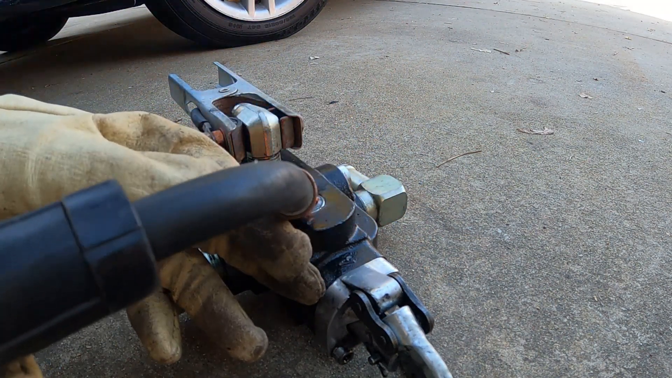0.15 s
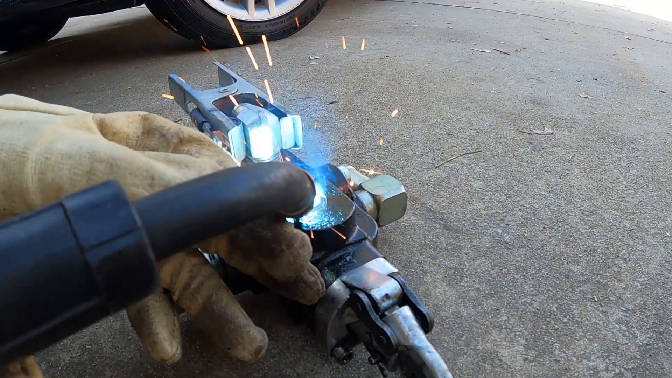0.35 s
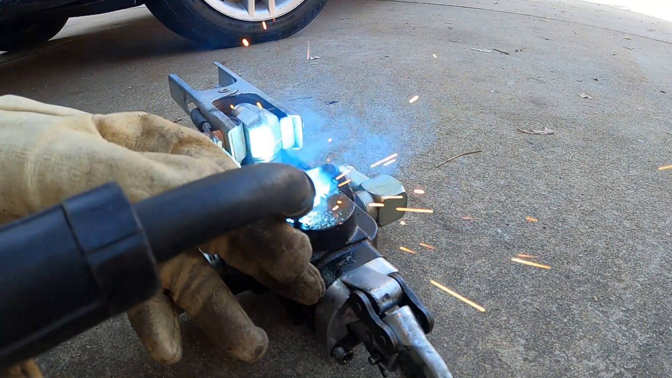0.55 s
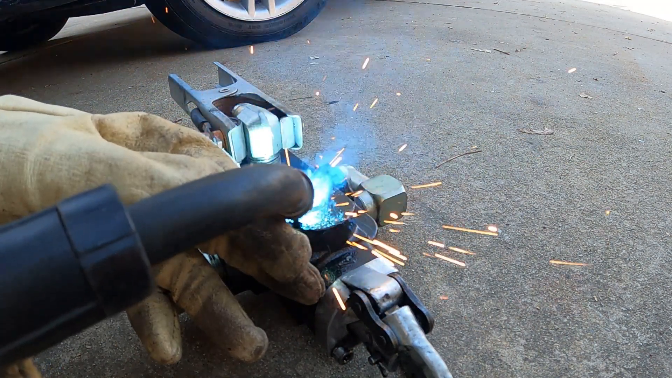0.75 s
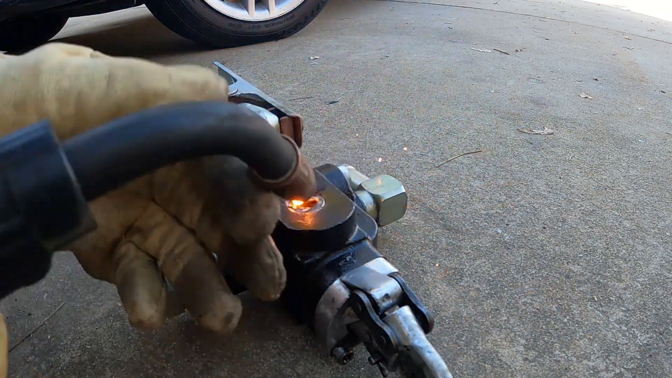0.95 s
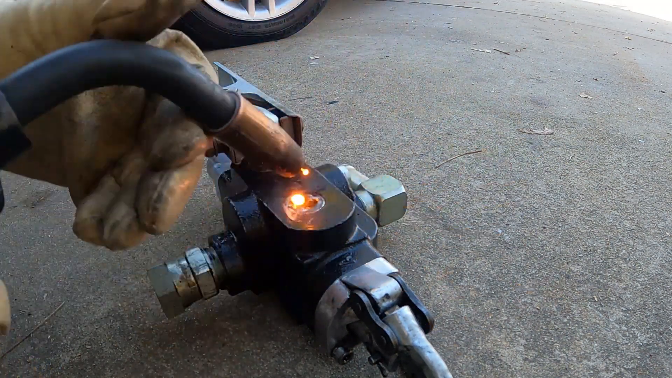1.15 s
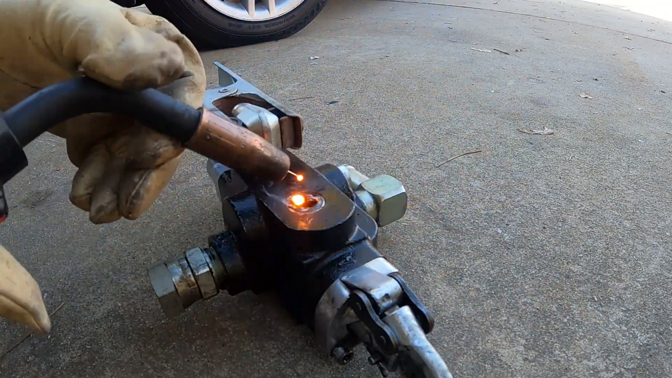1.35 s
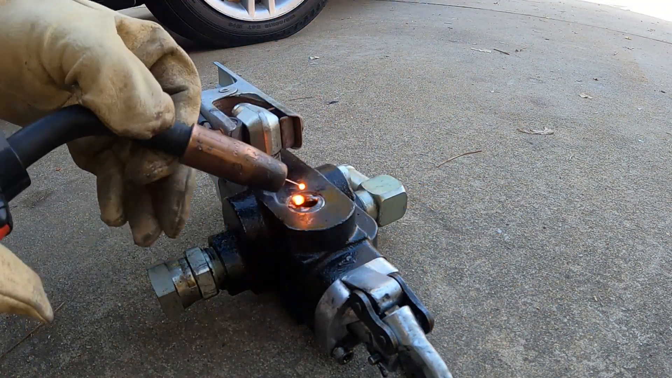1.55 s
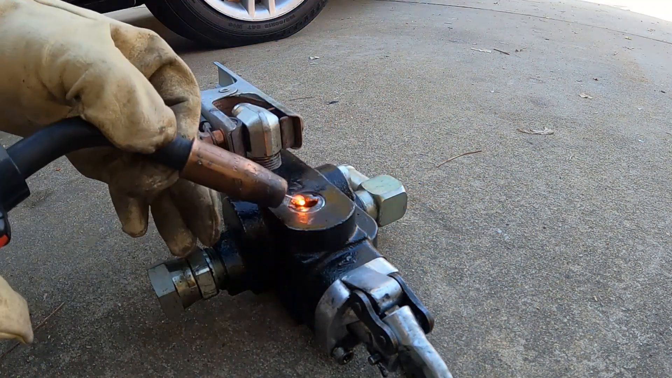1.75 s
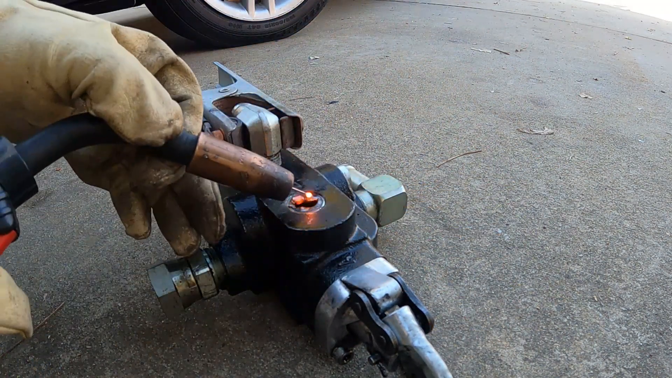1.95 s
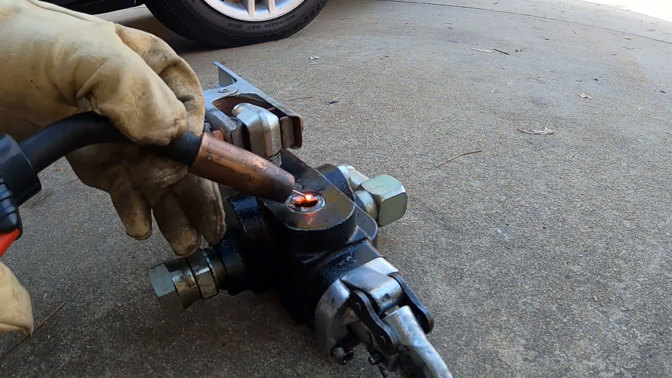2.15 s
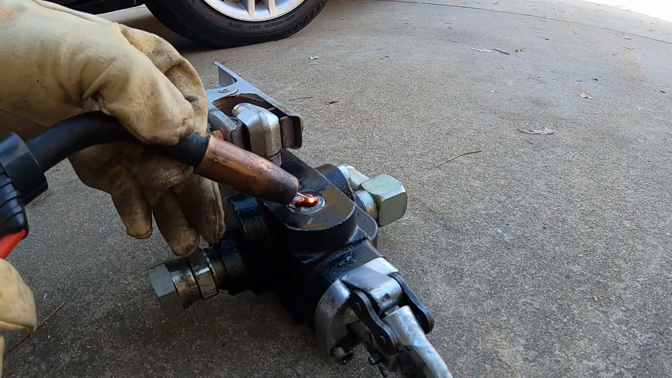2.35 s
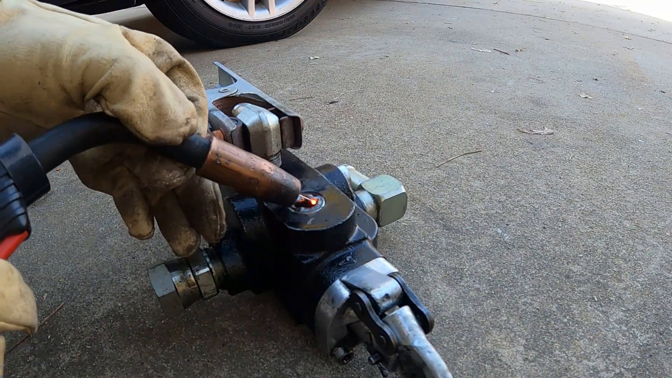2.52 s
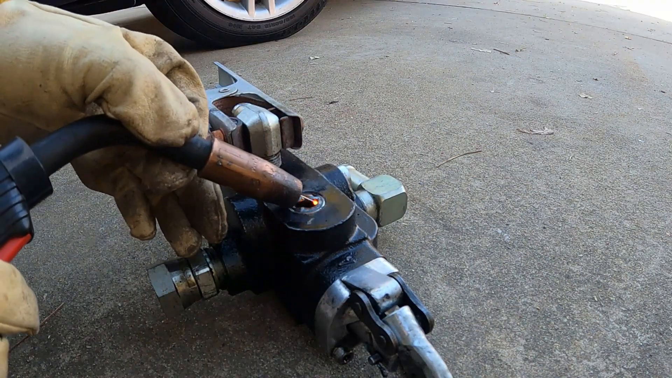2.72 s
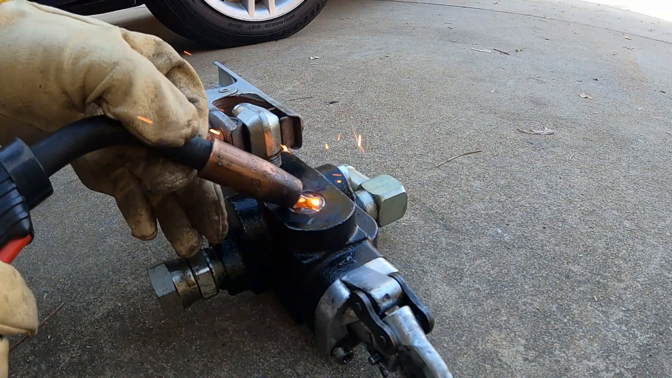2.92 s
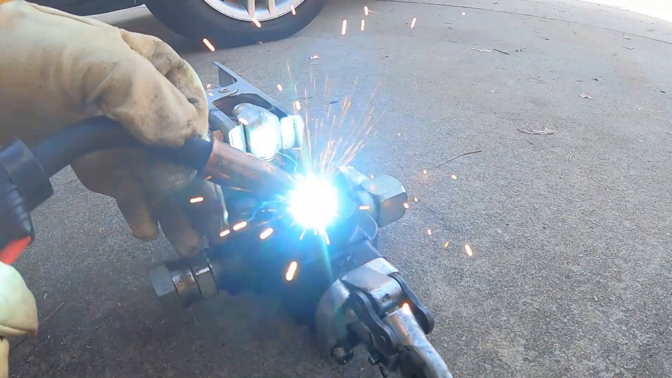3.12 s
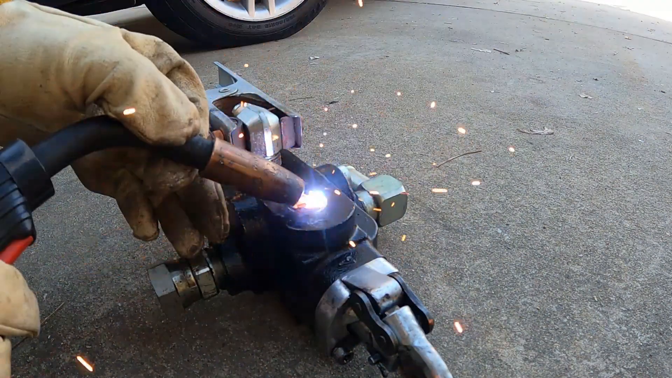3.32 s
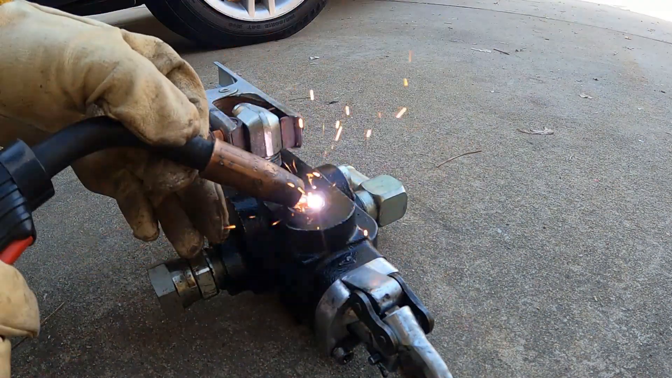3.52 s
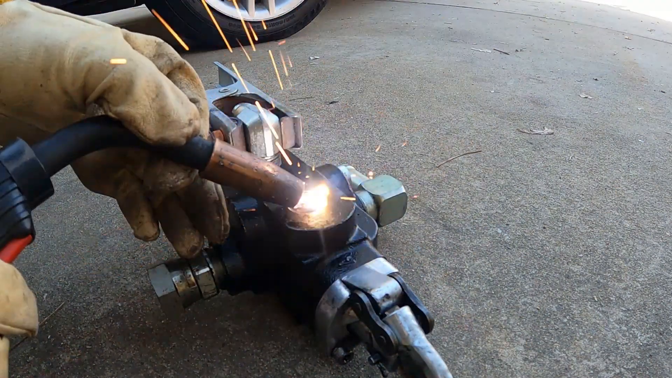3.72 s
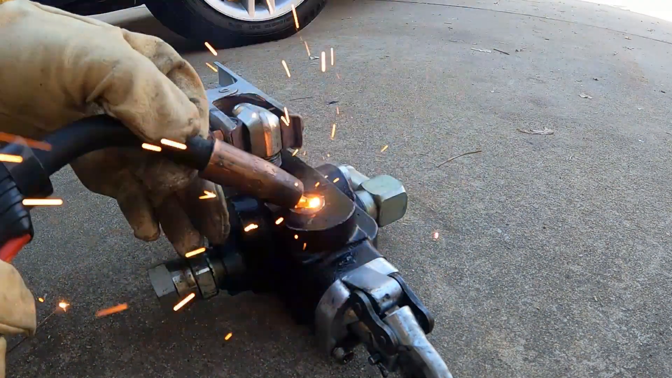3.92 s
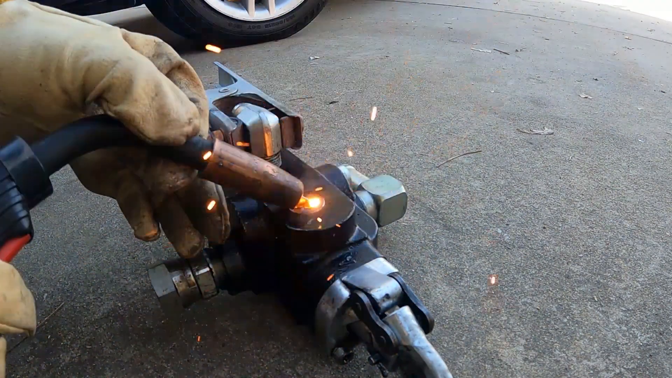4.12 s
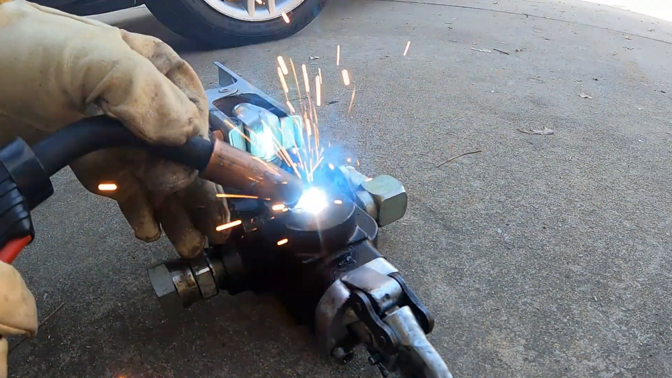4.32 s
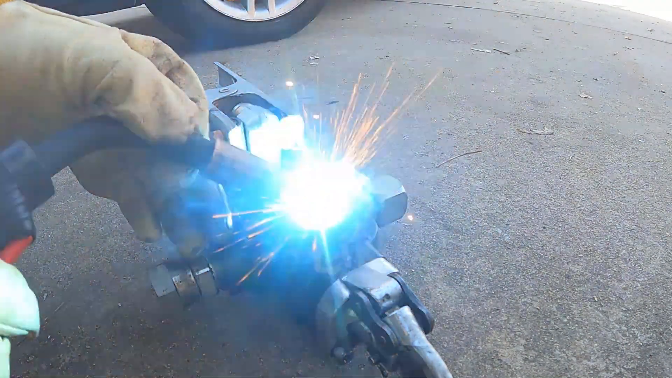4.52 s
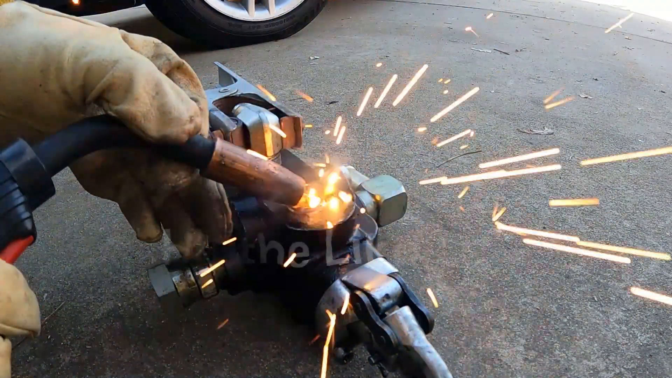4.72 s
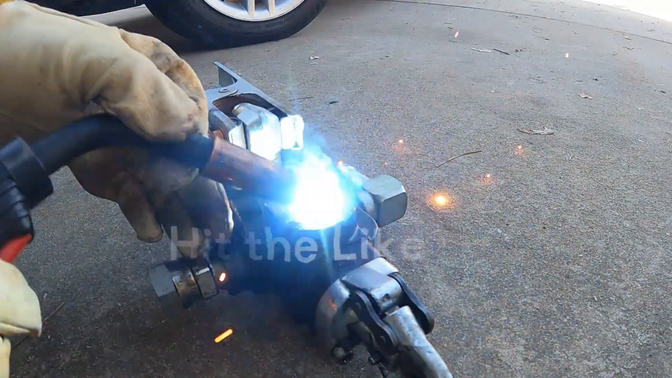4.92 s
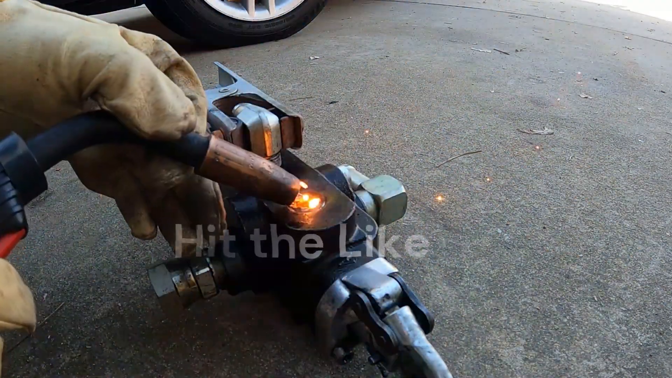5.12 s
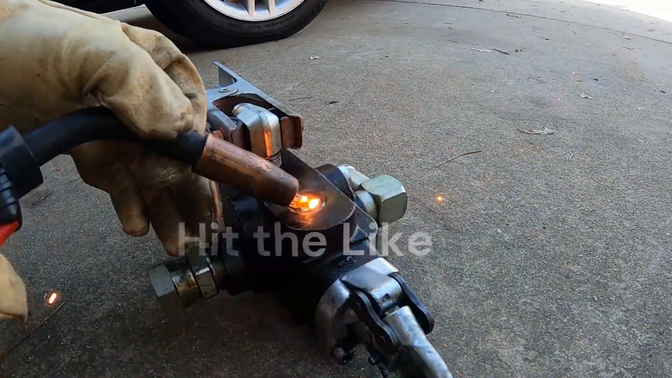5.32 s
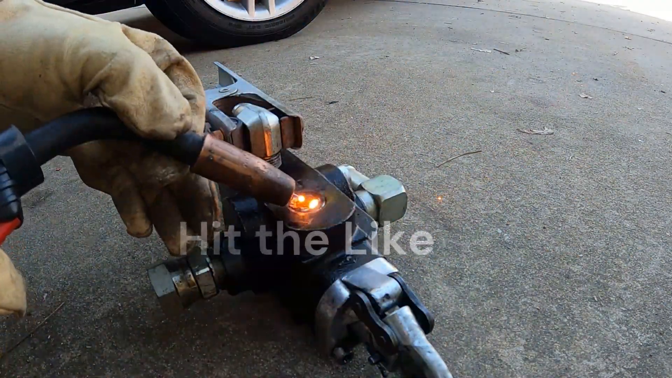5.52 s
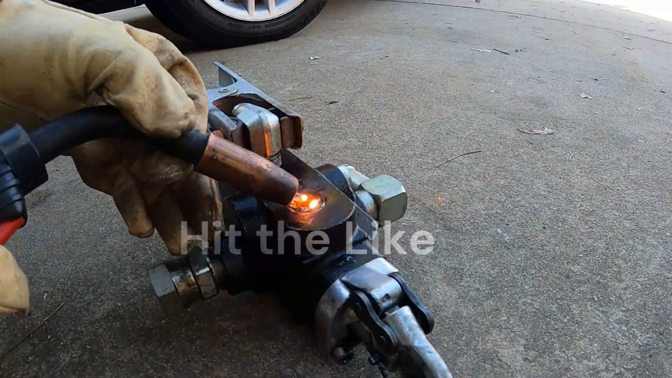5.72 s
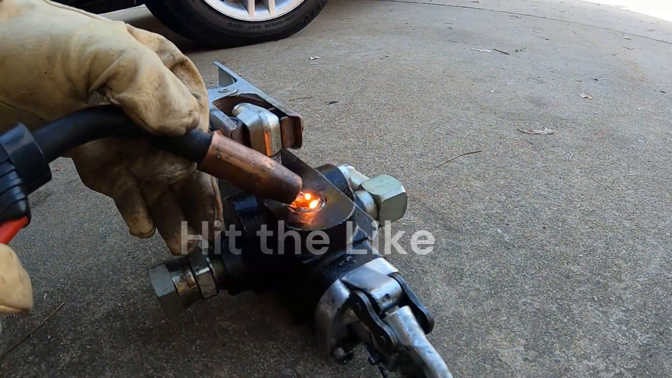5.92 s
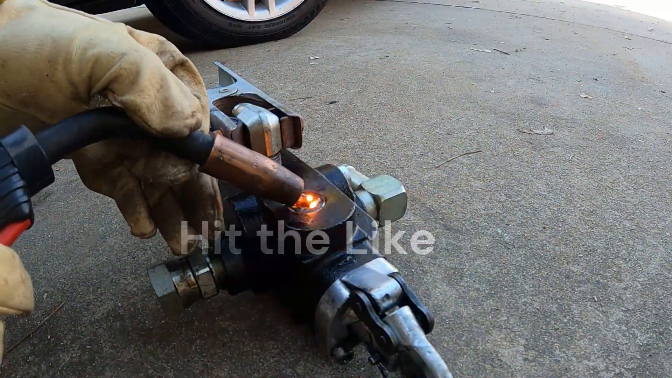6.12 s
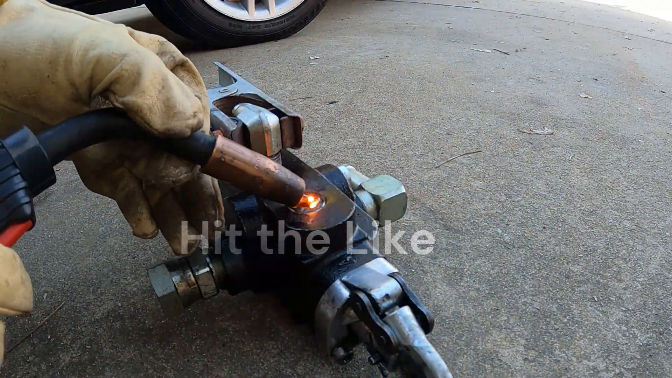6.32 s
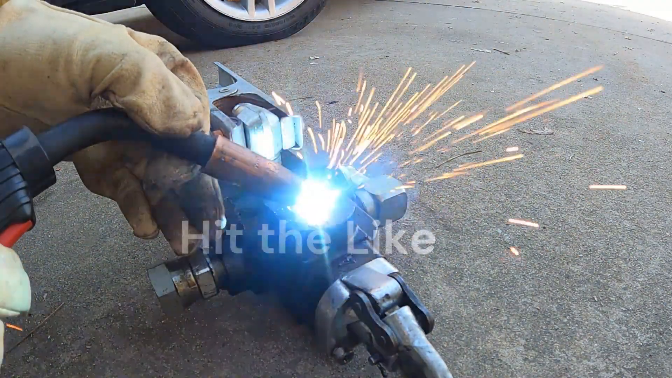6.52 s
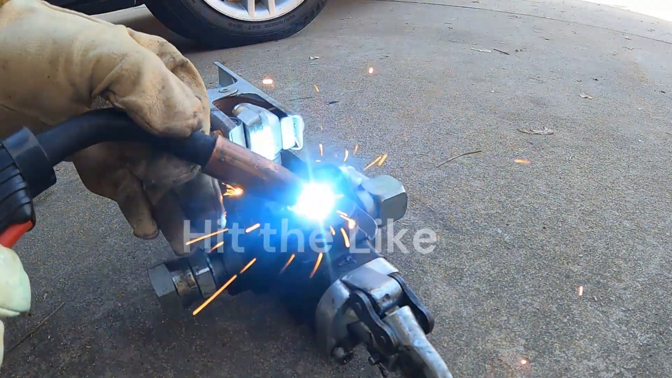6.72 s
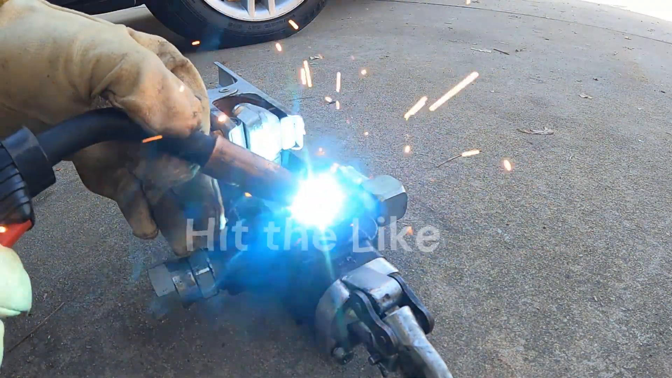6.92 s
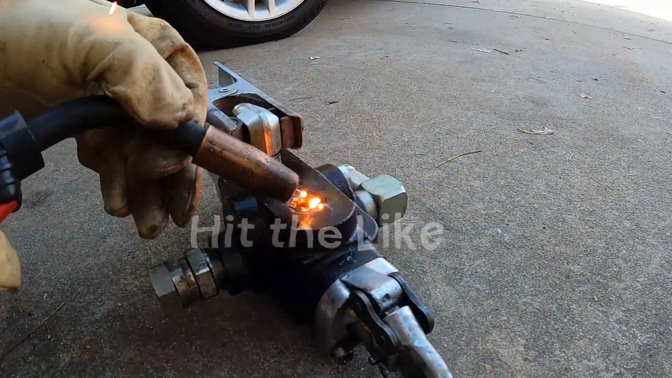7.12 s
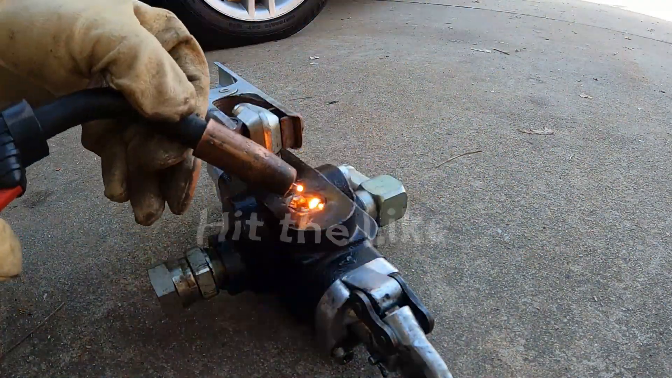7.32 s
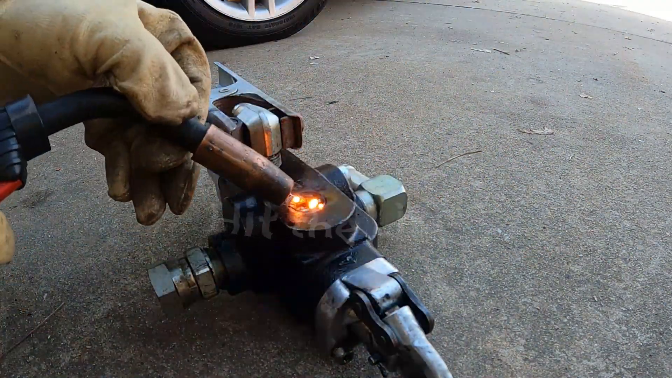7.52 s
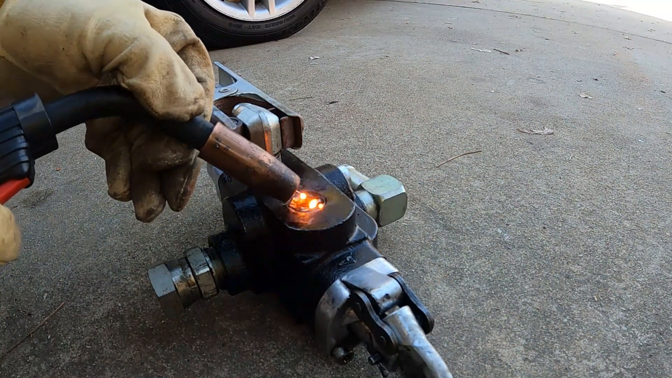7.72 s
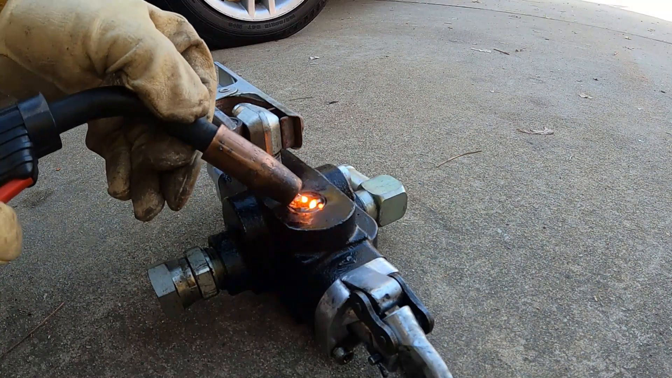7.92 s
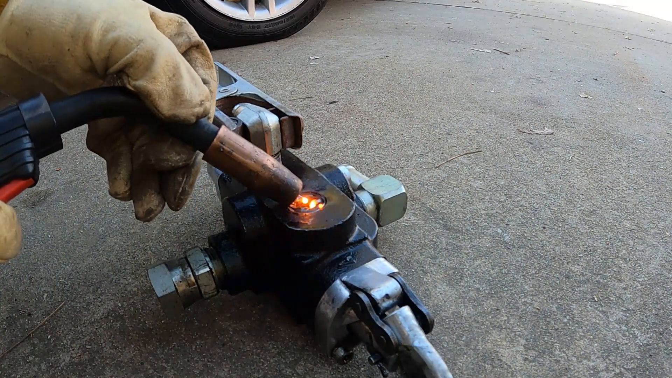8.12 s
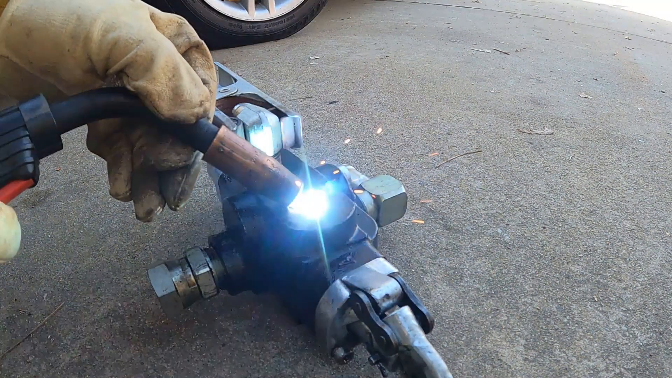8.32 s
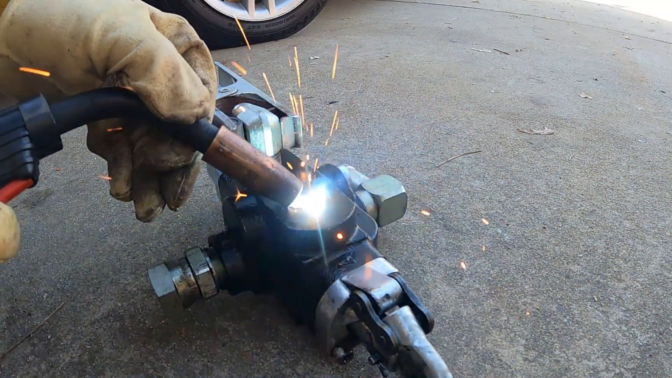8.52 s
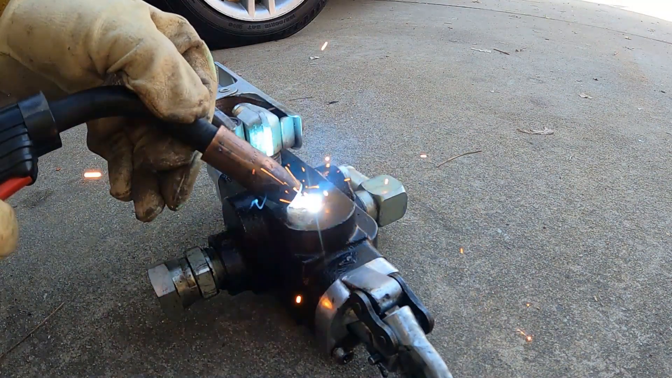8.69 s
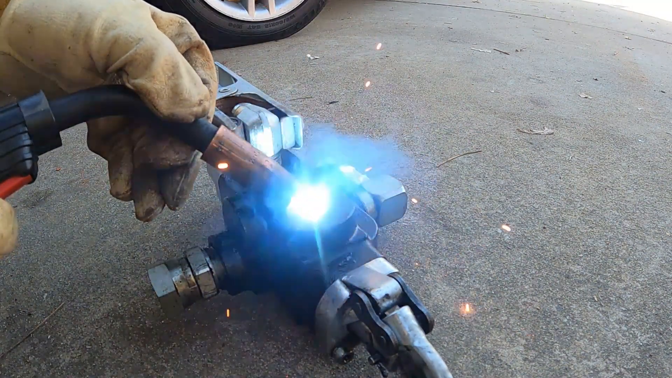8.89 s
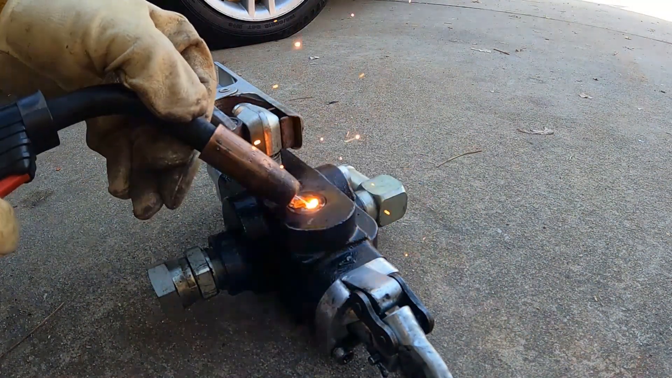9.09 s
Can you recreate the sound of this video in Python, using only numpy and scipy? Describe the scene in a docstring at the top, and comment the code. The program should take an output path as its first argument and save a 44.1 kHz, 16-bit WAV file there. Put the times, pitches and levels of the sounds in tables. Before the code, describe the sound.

Four bursts of sharp, sizzling crackle come from a wire-feed welding torch working on steel, heard close up on a concrete drive. Each opens with a trigger rattle and a puff of gas that buffets the microphone. The second burst is the longest; the others last about half a second. In between, gas and hot metal hiss softly while the machine hums and its fan whines, with light wind.

```python
"""On a concrete drive, microphone close up: a wire-feed welder tacks a steel fitting in four bursts.
First, transformer hum, fan whine and a little wind. The trigger rattles, shielding gas surges, and
the arc starts: each short circuit of the wire sizzles up, cracks and puffs hot gas at the microphone,
while the hum sinks. The trigger lets go; gas and hot bead hiss and the hum creeps back.
The longest burst follows at 3 s, then short ones at 6.6 s and 8.4 s."""
import sys
import numpy as np
from scipy import signal
from scipy.io import wavfile
from scipy.ndimage import uniform_filter1d

SR = 44100
rng = np.random.default_rng(int(sys.argv[2]) if len(sys.argv) > 2 else 0)


def bounce(signal):
    """Save signal as a 16-bit WAV file at the path given by the first command-line argument."""
    frames = np.transpose(np.atleast_2d(signal))
    limited = np.clip(frames, -1, 1)
    pcm = np.round(limited * 32767).astype(np.int16)
    wavfile.write(sys.argv[1], SR, pcm)


N = 403515
T = np.arange(N) / SR
ARC_RISE_S = .02
# arc burning: start/s, end/s, hum under the arc/dB, hum settled/dB, recovery/s, rumble/dB, arc hiss/dB
WELDS = [(.36, 0.98, -35.5, -32.5, 0.85, -31.5, -50), (3.04, 5.013, -38.5, -35.5, 0.56, -33, -48.5),
         (6.6, 7.061, -41, -33.5, 1.27, -33.5, -47), (8.444, 8.964, -37, -37, .5, -44, -44.5)]


def arc():
    """The wire shorts to the steel again and again; torch and glove colour each burst by their pose."""
    # t/s, crack/dB, signed puff pressure/linear, sizzle/dB
    short_circuits = [(0.3714, -2, 0.42, -22.5), (0.4054, -20, 0.079, -24), (0.4185, -5, 0.14, -25),
                      (0.4334, -13, -0.033, -27), (0.447, -9, -0.14, -37), (0.4622, -11.5, 0.063, -27),
                      (0.481, -10.5, 0.086, -25), (0.5, -15, 0.016, -35), (0.6, -8, -0.022, -23.5),
                      (0.6141, -9.5, -0.099, -34), (0.6221, -14, -0.14, -37), (0.6325, -14, -0.046, -39),
                      (0.6391, -13, -0.12, -34), (0.646, -24, 0.043, -39), (0.6555, -13, -0.1, -39),
                      (0.663, -15, -0.19, -35), (0.6773, -9.5, -0.076, -36), (0.6928, -13.5, 0.018, -32),
                      (0.7074, -14, 0.039, -35), (0.7185, -19, 0.17, -37), (0.7277, -11.5, 0.077, -36),
                      (0.739, -16, -0.12, -39), (0.7474, -15, -0.14, -39), (0.7551, -11.5, -0.12, -35),
                      (0.7629, -14, -0.064, -45), (0.7714, -11.5, -0.1, -38), (0.78, -12.5, -0.1, -38),
                      (0.7915, -15, -0.03, -41), (0.803, -16, -0.037, -36), (0.8115, -12, -0.16, -36),
                      (0.8213, -14, -0.13, -41), (0.829, -12, -0.15, -34), (0.838, -12, -0.088, -35),
                      (0.8524, -14, 0.081, -33.5), (0.861, -9.5, 0.048, -43), (0.8711, -16, 0.021, -38),
                      (0.8796, -11, -0.02, -40), (0.889, -14, -0.049, -37), (0.9, -9, -0.11, -35),
                      (0.9097, -17, -0.048, -35), (0.921, -10.5, -0.028, -34), (0.9352, -14, 0.023, -37),
                      (0.9458, -10, 0.061, -36), (0.9597, -15, 0.063, -40), (0.9733, -12.5, 0.038, -29.5),
                      (3.0459, -0.5, 0.29, -19.5), (3.0811, -4.5, 0.13, -22), (3.1046, -9, 0.44, -23.5),
                      (3.1342, -9, -0.1, -28.5), (3.1914, -7.5, -0.0072, -24), (3.2309, -19, -0.42, -23),
                      (3.274, -10.5, 0.11, -22), (3.3206, -6, -0.12, -24), (3.3506, -13, 0.096, -33),
                      (3.3899, -10, -0.26, -27), (3.4102, -14, 0.076, -36), (3.425, -15, 0.019, -27.5),
                      (3.463, -12, -0.088, -25.5), (3.502, -15.5, -0.11, -29.5),
                      (3.573, -9.5, -0.15, -22.5), (3.613, -12, -0.12, -29.5), (3.625, -22, 0.039, -39),
                      (3.633, -15.5, 0.1, -36), (3.655, -13.5, -0.12, -28.5), (3.7001, -12, -0.0055, -30),
                      (3.716, -15, -0.11, -33), (3.7219, -12.5, -0.13, -31), (3.7335, -11, -0.18, -29.5),
                      (3.7395, -10.5, -0.15, -37.5), (3.751, -17.5, -0.071, -32), (3.7571, -17, -0.12, -38),
                      (3.7747, -17.5, -0.01, -40), (3.792, -15, -0.04, -28.5), (3.8496, -8.5, 0.24, -23.5),
                      (3.8856, -11, 0.029, -38), (3.8997, -27, 0.037, -42), (3.9052, -12.5, -0.23, -29),
                      (3.9123, -23, -0.06, -29.5), (3.9258, -14, 0.057, -37), (3.933, -13, 0.044, -38),
                      (3.9433, -15, 0.01, -34), (3.9593, -12, -0.076, -26.5), (3.9819, -15, -0.14, -29),
                      (4.0096, -14.5, -0.06, -32), (4.0194, -18.5, -0.0069, -26.5),
                      (4.034, -14.5, -0.04, -42), (4.0414, -17, -0.15, -25.5), (4.0493, -10, -0.2, -56),
                      (4.0834, -15, -0.011, -28.5), (4.098, -31, 0.017, -46), (4.106, -13, -0.15, -35),
                      (4.1497, -13, 0.24, -23.5), (4.1797, -12, -0.11, -28.5), (4.208, -12, 0.052, -25),
                      (4.219, -12.5, 0.18, -25), (4.2532, -18, 0.071, -39), (4.2851, -9, 0.077, -27),
                      (4.3256, -11, -0.17, -24.5), (4.361, -18.5, 0.014, -35), (4.368, -16, 0.026, -39),
                      (4.3755, -12, 0.00013, -36), (4.3826, -16, -0.16, -32), (4.3968, -15, 0.21, -21.5),
                      (4.4124, -15.5, -0.02, -38), (4.423, -21, -0.054, -31), (4.4375, -19, 0.017, -34),
                      (4.4469, -13, -0.078, -35), (4.4861, -10, -0.17, -25.5), (4.5417, -9.5, 0.05, -27),
                      (4.5485, -18.5, 0.041, -33), (4.5557, -12, 0.11, -27), (4.577, -15, 0.084, -27.5),
                      (4.5971, -16, -0.041, -31.5), (4.6502, -8.5, -0.039, -26.5),
                      (4.688, -27.5, 0.047, -40), (4.6972, -16, 0.011, -36), (4.7115, -8, -0.19, -20.5),
                      (4.7345, -17, -0.00033, -31), (4.7464, -16, 0.041, -34), (4.7555, -15, -0.082, -33),
                      (4.7706, -17, -0.026, -34), (4.7829, -5, 0.075, -21), (4.8433, -8, 0.36, -26),
                      (4.893, -15, -0.027, -43), (4.901, -14.5, -0.043, -31.5), (4.9132, -14, 0.024, -35),
                      (4.924, -13, -0.021, -31), (4.9305, -15, 0.012, -42), (4.9407, -13.5, 0.076, -38),
                      (4.9484, -14, -0.067, -34), (4.9625, -16.5, -0.13, -30), (4.9788, -14, -0.067, -35),
                      (4.9959, -15, -0.069, -29.5), (6.5632, -2.5, 0.06, -27), (6.625, -3.5, -0.071, -24.5),
                      (6.634, -15, -0.3, -41), (6.646, -11, -0.32, -30), (6.6638, -15, -0.066, -34),
                      (6.6733, -17, -0.14, -36), (6.6833, -16, 0.033, -35), (6.694, -17, 0.036, -38),
                      (6.705, -11.5, -0.23, -28.5), (6.7184, -13, 0.032, -35), (6.735, -9.5, -0.14, -31),
                      (6.752, -13, -0.25, -27.5), (6.7659, -11.5, -0.18, -31), (6.7817, -14, 0.041, -36),
                      (6.7965, -7, 0.36, -27.5), (6.8103, -19, 0.034, -42), (6.8257, -15, -0.065, -31),
                      (6.8407, -12.5, -0.036, -35), (6.8541, -14, -0.098, -35), (6.8687, -13, 0.057, -31),
                      (6.8822, -13, -0.12, -30), (6.9005, -13.5, -0.14, -36), (6.909, -13, -0.13, -30),
                      (6.9226, -13, -0.16, -34), (6.937, -15, -0.021, -37), (6.951, -12, -0.17, -27.5),
                      (6.9667, -13.5, -0.098, -33), (6.9828, -21, 0.02, -48), (6.9893, -10, -0.11, -30.5),
                      (7.0043, -16, 0.0043, -34), (7.0255, -11.5, -0.075, -34), (7.0351, -11, -0.055, -29),
                      (7.0486, -11, -0.032, -30), (8.389, -11, -0.061, -33), (8.423, -28, 0.049, -32),
                      (8.4595, -13, -0.023, -23.5), (8.4714, -4, -0.29, -20), (8.4788, -13, -0.037, -34),
                      (8.4887, -11, -0.2, -36), (8.4961, -16, -0.18, -31), (8.5052, -21, -0.22, -30),
                      (8.5162, -9, 0.19, -23.5), (8.5234, -17, 0.028, -39), (8.5296, -12, 0.4, -32),
                      (8.5444, -13.5, 0.35, -29), (8.558, -13, 0.039, -27), (8.603, -23, 0.048, -38),
                      (8.6337, -8, 0.27, -26), (8.6474, -14, 0.29, -31), (8.665, -15, -0.047, -38),
                      (8.6796, -14, -0.005, -32), (8.685, -28, -0.037, -39), (8.6924, -13, 0.0013, -32),
                      (8.704, -14, -0.023, -36), (8.7154, -12, 0.027, -37), (8.7381, -15.5, -0.099, -27.5),
                      (8.7563, -11.5, 0.06, -31), (8.7676, -14, -0.04, -40), (8.789, -14, -0.05, -32),
                      (8.7946, -13.5, -0.11, -31), (8.817, -15, -0.0015, -28.5), (8.8283, -17, -0.02, -37),
                      (8.8366, -26, 0.095, -42.5), (8.8546, -13, -0.22, -25.5), (8.8824, -13.5, 0.032, -44),
                      (8.894, -16, -0.14, -24.5), (8.912, -21, 0.032, -36), (8.9174, -9, 0.23, -29.5),
                      (8.935, -16, 0.21, -30), (8.963, -13, 0.0072, -28.5), (9.05, -21, 0.039, -38),
                      (9.0667, -13.5, 0.011, -27.5), (9.072, -11.5, -0.05, -25.5),
                      (9.1366, -8.5, -0.06, -25)]
    # from t/s, nozzle ring f/Hz, width/Hz, ring/dB re snap, low cut f/Hz, heave/dB re crack
    poses = [(0, 5580, 2010, -9.5, 297, -7.5), (2, 5177, 900, -6.5, 920, -8.5),
             (6, 5120, 900, -5.5, 870, -7), (8, 5303, 800, -2.5, 1700, -11.5)]
    shorts = np.array(short_circuits)
    pose_index = np.searchsorted([pose[0] for pose in poses], shorts[:, 0]) - 1
    return sum(burst(shorts[pose_index == k], *pose[1:]) for k, pose in enumerate(poses))


def burst(shorts, ring_hz, width_hz, ring_db, low_cut_hz, heave_db):
    """Each bridge of molten wire fizzes ever louder, cracks, and sends a slow puff a few ms later."""
    # what a crack rings in fitting and microphone port: f/Hz, width/Hz, level/dB
    fitting_modes = [(1083, 760, -4), (2637, 700, -0.5), (4070, 360, -2), (6240, 470, -3),
                     (8120, 810, -1.5), (9030, 580, -2.5), (9580, 1900, -17.5), (13000, 6400, -38),
                     (670, 600, 0)]
    times, crack_db, puff_pressure, sizzle_db = np.transpose(shorts)
    t, lead = T[:1500], 12
    since = t - lead / SR
    snap = .95 * bump(since, -.00011, .000062) - 1.35 * bump(since, 0, .000054)  # push, sharp suction
    nozzle = -np.cos(2 * np.pi * ring_hz * since) * bump(since, 0, .0013) * (since > -1 / (4 * ring_hz))
    fitting = undb(-3) * resonate(snap, fitting_modes, steep=True)
    parts = (snap, undb(ring_db) * nozzle, fitting)
    # each drop bursts at another spot, so nozzle and fitting answer more or less
    shares = undb(crack_db[:, None] + rng.standard_normal((len(times), 3)) * [0, 2, 3])
    cracks = sum(strike(times, share, part, lead) for share, part in zip(shares.T, parts))
    cracks = butter(cracks, 1, [low_cut_hz, 9000], "band")

    heave = bump(since, .0013, .0006) - .5 * bump(since, .0042, .0015)  # heated air swells, falls back
    heaves = strike(times, undb(crack_db + heave_db), heave, lead)
    # steep front, long back, then the air swings the other way
    age_ms = np.maximum(since - .0011, 0) / .001
    puff = 2.1 * age_ms ** 2 * np.exp(-age_ms) - .36 * bump(since, .008, .006)
    puffs = strike(times, puff_pressure, puff, lead)

    grit = rough_noise(2, 900)
    fizz = sum(undb(3 * walk(40)) * steep_band(grit, hz, width) * undb(db)  # the colour drifts
               for hz, width, db in fitting_modes)
    fizz += undb(ring_db + 12.5) * steep_band(grit, ring_hz, width_hz)
    fizz = unit(butter(fizz, 1, low_cut_hz, "high"))
    swell = np.concatenate([np.exp(-t[::-1] / .0025), 1.73 * np.exp(-t / .0033)])  # rise, then spatter
    brewing = np.exp(-t[::-1] / .01)  # big drops fizz for longer
    sizzle = strike(times, undb(sizzle_db), swell, lead=len(t))
    sizzle += strike(times, undb(1.31 * sizzle_db + 6.5), brewing, lead=len(t) - 1)
    return cracks + heaves + puffs + sizzle * fizz


def trigger():
    """Relay and gas valve rattle in the torch as the trigger is pulled or released."""
    # rattles: t/s, level/dB, decay/s
    clicks = [(.293, -36, 0.0089), (.313, -24, 0.03), (1.028, -53, 0.016), (3.007, -22.5, .02),
              (5.058, -41.5, 0.028), (6.523, -22, 0.026), (7.118, -36.5, 0.013), (8.316, -23.5, 0.02)]
    # torch body: f/Hz, width/Hz, level/dB
    torch_modes = [(1186, 420, -7), (1970, 270, -2.5), (2380, 290, -2.5), (3200, 300, -2.5),
                   (4250, 240, -13), (6640, 7000, -17.5)]
    times, db, decay = np.transpose(clicks)[:, :, None]
    since = np.maximum(T - times, 0)
    rattle = unit(resonate(rough_noise(1, 400), torch_modes, steep=True))
    return rattle * np.sum(undb(db) * (1 - np.exp(-since / .001)) * np.exp(-since / decay), axis=0)


def wire_rasp():
    """The wire starts to feed with a rasp that sinks in pitch as its upper band dies first."""
    # feed starts: t/s, level/dB
    starts = [(.325, -39), (8.33, -35)]
    grit = rough_noise(2.6, 300)
    return sum(undb(db) * fade(at, fall_s) * unit(steep_band(grit, hz, width_hz=990))
               for at, db in starts for hz, fall_s in ((2280, .03), (1500, .11)))


def gas_surge():
    """Gain of the rush of gas as the valve opens; it drives both hiss and rumble."""
    # valve openings: t/s, rumble/dB
    openings = [(.32, -26), (3.02, -21), (6.53, -24.5), (8.32, -28.5)]
    return sum(undb(db) * fade(at, fall_s=.046) for at, db in openings)


def hiss():
    """Dense tiny crackles of gas, arc and cooling bead; three groups of resonances flicker apart."""
    # gas and bead: t/s, main group/dB, low group/dB re main, top group/dB re main
    levels = [(0, -43, -1.5, -5), (.3, -42, -1.5, -6.5), (1.03, -48.5, 4, -5), (1.45, -35, -4.5, -10),
              (1.8, -34.5, -5, -7.5), (2.2, -37.5, -4.5, -4.5), (2.97, -41, -4, -6),
              (5.04, -46.5, -2.5, -12.5), (5.2, -50, -4.5, -7), (5.5, -48.5, -5, -5.5),
              (6.2, -52, -1.5, -6), (6.5, -53.5, -2, -7), (7.09, -50, 1, -9), (7.3, -62, 2.5, -3),
              (8.05, -62, 3, -4), (8.3, -57.5, -3, -2.5), (9.15, -47, -2, -9)]
    # resonances of the three groups: f/Hz, width/Hz, level/dB
    low_modes = [(927, 640, 1.5), (1700, 720, 0), (2685, 1130, 6.5), (4054, 1100, 2.5)]
    main_modes = [(4990, 580, 0.5), (5380, 210, -1), (5810, 690, -3)]
    top_modes = [(7590, 1020, 0.5), (8680, 630, 1), (9740, 1300, -5.5), (13800, 2200, -27)]
    times, *columns = np.transpose(levels)
    gas_db, low_db, top_db = (np.interp(T, times, column) for column in columns)
    arc_db = np.transpose(WELDS)[6]
    main_db = total_db(undb(gas_db), while_welding(arc_db, fall_s=.012))
    low_db = total_db(undb(low_db), gas_surge() * undb(-8 - main_db))
    grain = rough_noise(1.6, 500)
    grain += (rng.random(N) < 150 / SR) * undb(rng.uniform(10, 19, N))  # about 150 ticks a second
    grain -= .85 * band(grain, 4400, 500)  # the nozzle mouth cancels this band
    groups = ((low_modes, low_db), (main_modes, 0), (top_modes, top_db))
    return undb(main_db) * sum(undb(db + walk(14)) * unit(resonate(grain, modes, steep=True))
                               for modes, db in groups)


def welder():
    """The machine: transformer hum at twice the mains rate, fan whine, air in the cabinet."""
    # transformer tones: f/Hz, level/dB re hum
    hum_tones = [(120, 0.5), (240, -8.5), (916, -28.5)]
    # fan drift: t/s, turning tone f/Hz, whine/dB re hum
    fan_drift = [(0, 321.8, 5), (1.6, 323.8, 3.5), (2.4, 333.7, 1), (5.2, 323.5, -3.5), (5.901, 333.3, 3.5),
                 (6.2, 333.2, 3), (6.5, 335, 6), (6.55, 334.2, 9), (7.199, 324.2, 2), (7.85, 327.3, 4),
                 (8.299, 328, 1), (8.36, 326, 7), (9.15, 330, -18)]
    # fan harmonics: multiple, level/dB re whine
    fan_harmonics = [(1, -29), (2, -41), (3, -30.5), (4, -32), (5, -23), (6, -35), (10, -28)]
    # cabinet air noise: f/Hz, width/Hz, level/dB re hum
    air_bands = [(172, 100, -14.5), (411.5, 155, -17), (684, 82, -26.5), (1008, 260, -23),
                 (1284, 190, -25.5), (1686, 150, -25), (2210, 190, -27), (3420, 890, -25), (4450, 890, -29),
                 (12000, 5200, -40)]
    hum = sum(undb(db + .26 * walk(6.3)) * np.sin(2 * np.pi * hz * T + k)
              for k, (hz, db) in enumerate(hum_tones))
    times, fan_hz, whine_db = np.transpose(fan_drift)
    turn = 2 * np.pi * np.cumsum(np.interp(T, times, fan_hz) * (1 + .00199 * walk(30))) / SR
    fan = sum(undb(db + 2.5 * walk(8)) * np.sin(multiple * turn) for multiple, db in fan_harmonics)
    fan *= undb(np.interp(T, times, whine_db))
    air = sum(undb(db) * unit(steep_band(rng.standard_normal(N), hz, width))
              for hz, width, db in air_bands)
    return undb(hum_level()) * (np.sqrt(2) * (hum + fan) + air)


def hum_level(idle_db=-32, released_db=-40):
    """Level of the machine in dB: it sinks under each burst, then creeps back."""
    points = [(WELDS[0][0], idle_db)]
    next_starts = [weld[0] for weld in WELDS[1:]] + [T[-1] + 1]
    for (start, end, under_db, settled_db, recovery_s, *_), next_start in zip(WELDS, next_starts):
        points += [(start + ARC_RISE_S, under_db), (end, under_db), (end + ARC_RISE_S, released_db),
                   (end + recovery_s, settled_db), (next_start, settled_db)]
    return np.interp(T, *np.transpose(points))


def wind(calm_db=-46.5):
    """Low buffeting on the microphone from breeze, gas surges and the burning arc."""
    # gusts: t/s, level/dB
    gust_peaks = [(1.8, -41), (2.1, -40), (2.4, -38), (2.7, -41), (5.78, -34.5), (6.05, -37), (6.22, -32.5),
                  (6.45, -38.5), (8.97, -36)]
    gusts = sum(undb(db) * bump(T, at, width=.12) for at, db in gust_peaks)
    rumble_db = np.transpose(WELDS)[5]
    level_db = total_db(undb(calm_db), gusts, gas_surge(), while_welding(rumble_db, fall_s=.14))
    air = butter(rng.standard_normal(N), 3, 200, "low")
    buffet = unit(band(air, 55, 50) + .7 * band(air, 28, 20) + .2 * band(air, 150, 150))
    return undb(level_db + 3 * walk(14)) * buffet


def while_welding(db, fall_s):
    """Gain that rises with each burst, holds and dies away after it."""
    start, end = np.transpose(WELDS)[:2, :, None]
    rise = np.clip((T - start) / ARC_RISE_S, 0, 1)
    fall = np.exp(-np.maximum(T - end, 0) / fall_s)
    return np.sum(undb(db)[:, None] * rise * fall, axis=0)


def undb(db):
    """dB to gain."""
    return 10 ** (np.asarray(db) / 20)


def total_db(*gains):
    """Level of unrelated sounds added together."""
    return 10 * np.log10(sum(gain ** 2 for gain in gains))


def unit(x):
    """Scale to rms 1."""
    return x / np.sqrt(np.mean(x ** 2))


def butter(x, order, hz, kind):
    """Low, high or band pass with a flat passband."""
    return signal.sosfilt(signal.butter(order, hz, kind, fs=SR, output="sos"), x)


def band(x, hz, width_hz):
    """Two-pole resonance, gain 1 at the centre."""
    return signal.lfilter(*signal.iirpeak(hz, hz / width_hz, fs=SR), x)


def steep_band(x, hz, width_hz):
    """The same resonance twice over, for steeper skirts."""
    return band(band(x, hz, width_hz), hz, width_hz)


def resonate(x, modes, steep):
    """Sum of resonances, neighbours in opposite sign; steep ones leave dark valleys."""
    ring = steep_band if steep else band
    return sum((-1) ** k * undb(db) * ring(x, hz, width) for k, (hz, width, db) in enumerate(modes))


def walk(rate):
    """Random levels held 1 / rate s and slewed; spread near 1."""
    hold = int(SR / rate)
    steps = np.repeat(rng.standard_normal(N // hold + 1), hold)
    return 1.31 * uniform_filter1d(uniform_filter1d(steps, hold), hold)[:N]


def rough_noise(depth_db, rate):
    """White noise whose level flickers rate times a second."""
    return rng.standard_normal(N) * undb(depth_db * walk(rate))


def bump(t, at, width):
    """Bell-shaped swell."""
    return np.exp(-((t - at) / width) ** 2)


def fade(at, fall_s):
    """Sudden onset, exponential decay."""
    return (T > at) * np.exp(-np.maximum(T - at, 0) / fall_s)


def strike(times, sizes, shape, lead):
    """Lay a shape at each time, starting lead samples early."""
    train = np.bincount((times * SR).astype(int), sizes, N)
    return signal.fftconvolve(train, shape)[lead:lead + N]


def scene():
    """All sources at the microphone, almost mono: a faint diffuse smear widens the upper range."""
    mid = arc() + trigger() + wire_rasp() + hiss() + welder() + wind()
    smear = rng.standard_normal(300) * np.exp(-T[:300] / .0031)
    diffuse = signal.fftconvolve(mid, smear / np.linalg.norm(smear))[:N]
    side = undb(-27) * steep_band(diffuse, 1300, 9000) + undb(5) * steep_band(diffuse, 12400, 1500)
    side = butter(side, 4, 300, "high")  # the bass is mono
    return mid + np.array([side, -side])


def record(dry):
    """The recorder cuts subsonic drift, rounds the loudest peaks and cuts the top."""
    dry = butter(dry, 2, 18, "high")
    rounded = dry / (1 + np.abs(dry / .9) ** 4) ** .25
    return signal.sosfilt(signal.ellip(12, .2, 70, 15750, fs=SR, output="sos"), rounded)


dry = scene()
out = record(dry)
bounce(out)
```